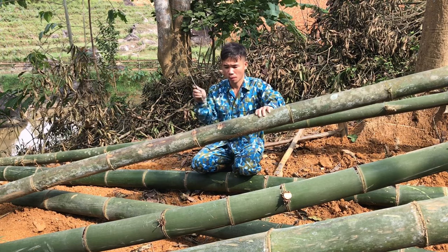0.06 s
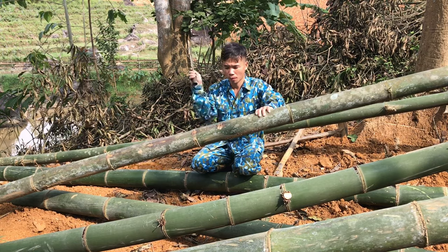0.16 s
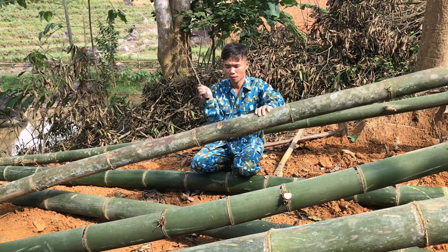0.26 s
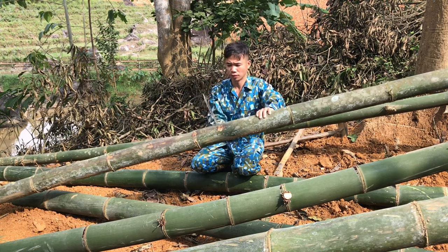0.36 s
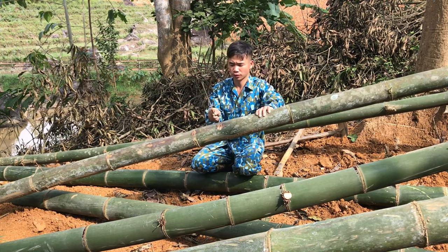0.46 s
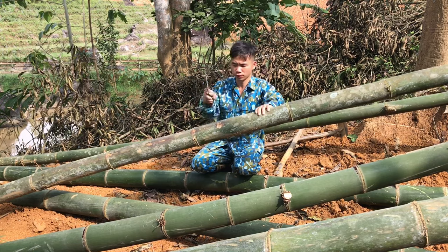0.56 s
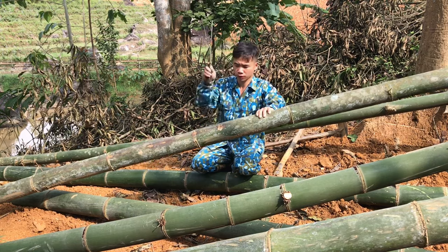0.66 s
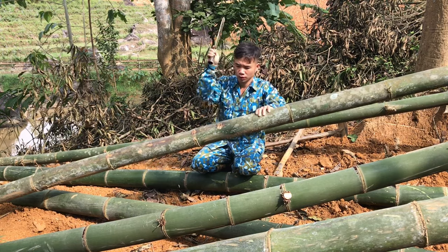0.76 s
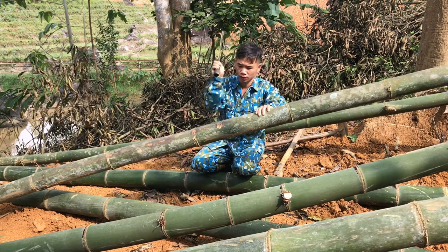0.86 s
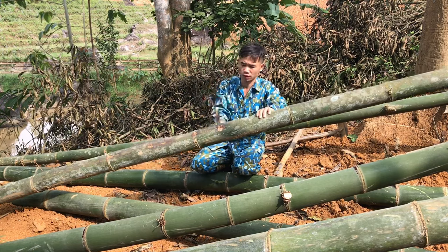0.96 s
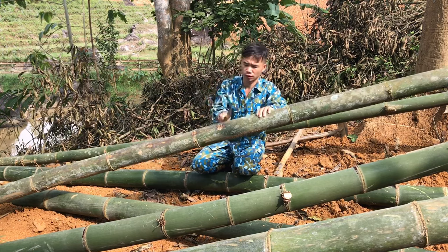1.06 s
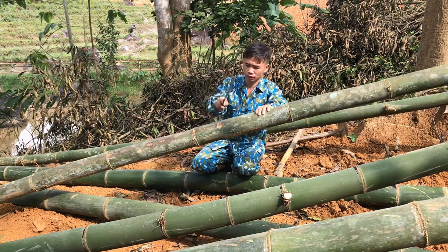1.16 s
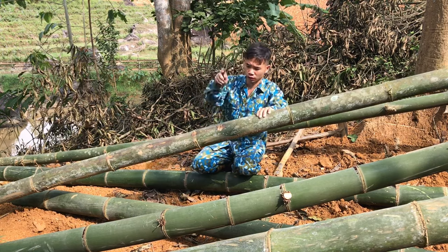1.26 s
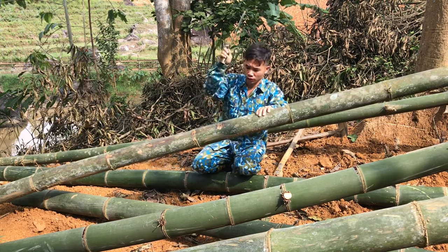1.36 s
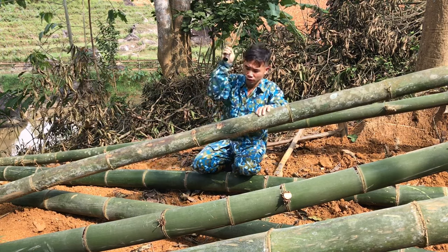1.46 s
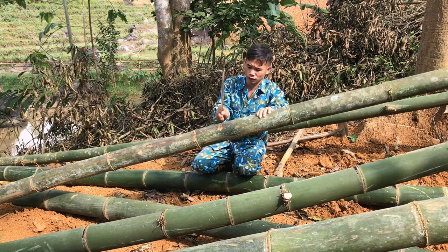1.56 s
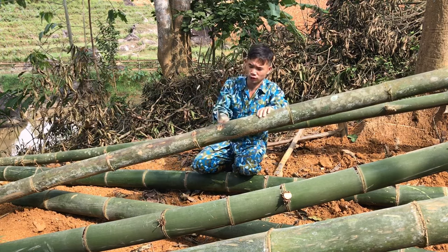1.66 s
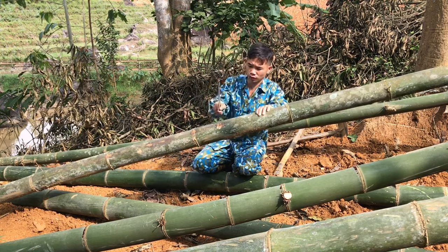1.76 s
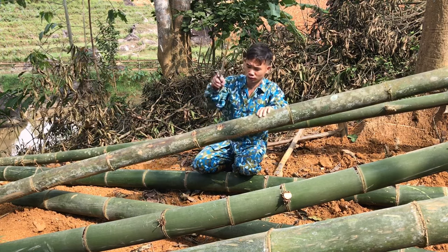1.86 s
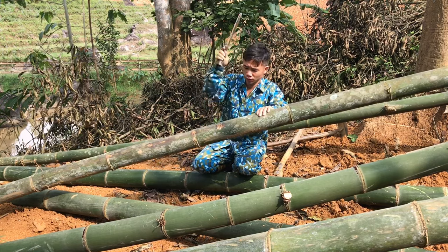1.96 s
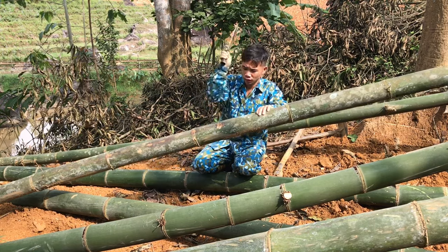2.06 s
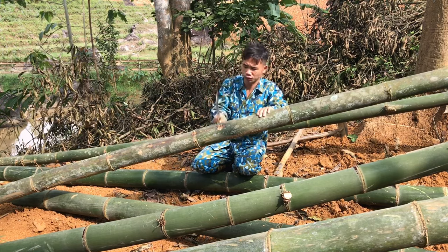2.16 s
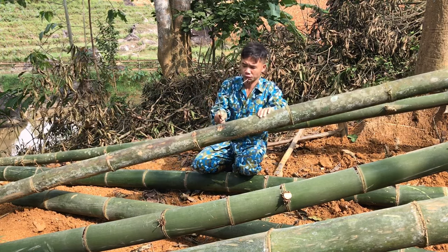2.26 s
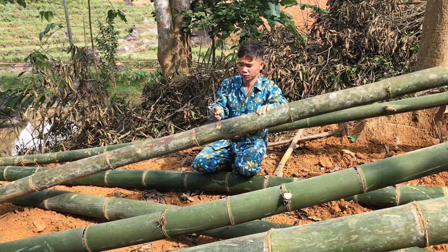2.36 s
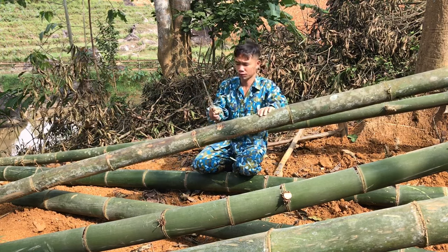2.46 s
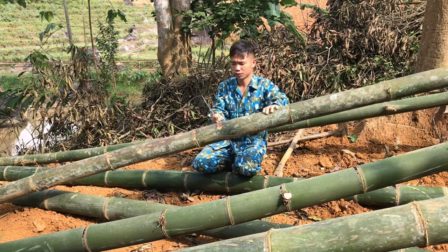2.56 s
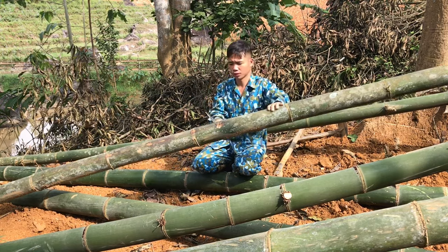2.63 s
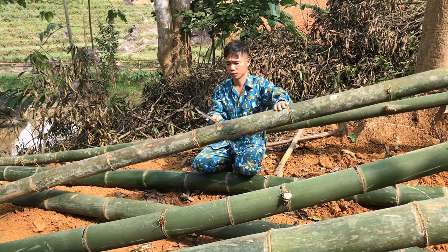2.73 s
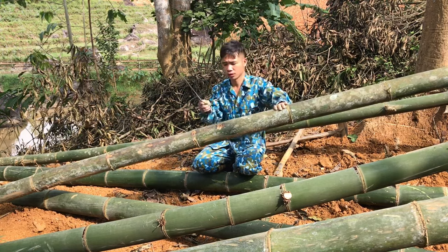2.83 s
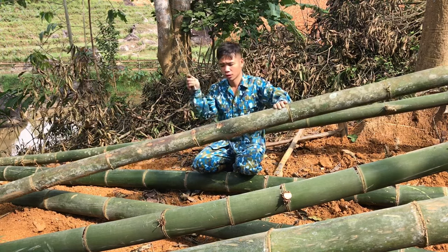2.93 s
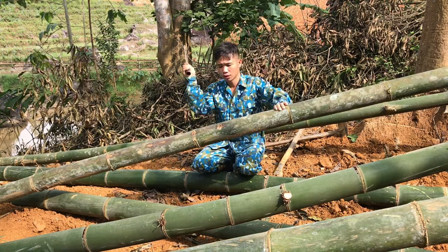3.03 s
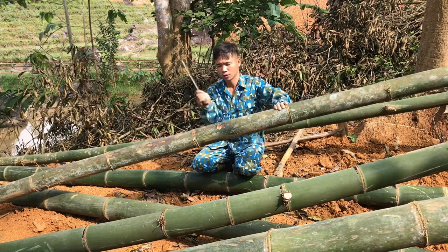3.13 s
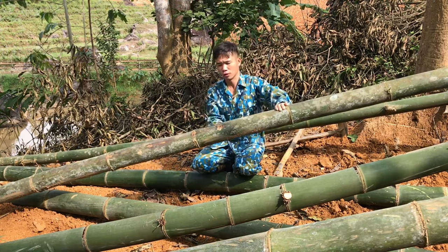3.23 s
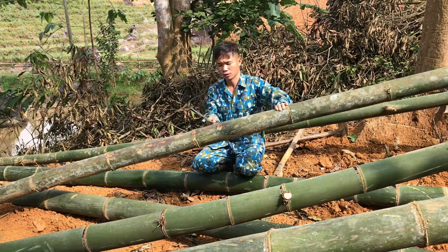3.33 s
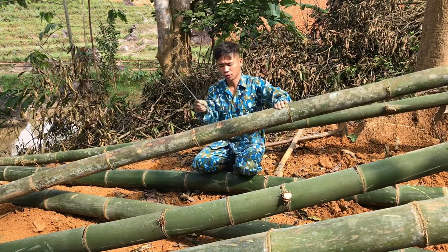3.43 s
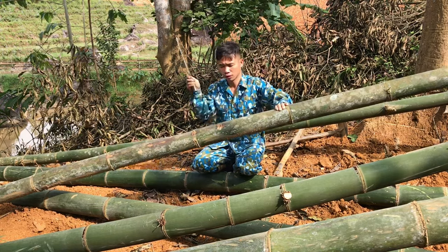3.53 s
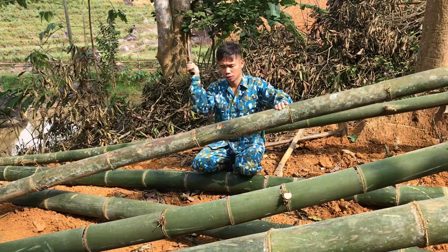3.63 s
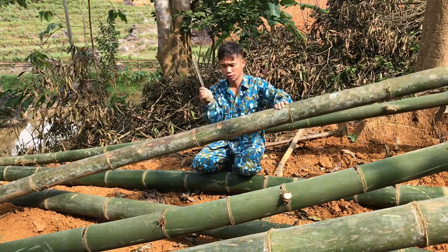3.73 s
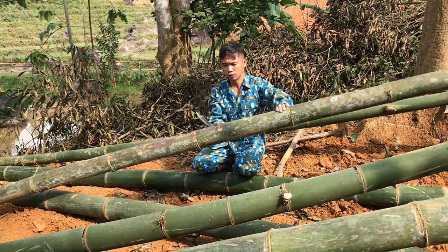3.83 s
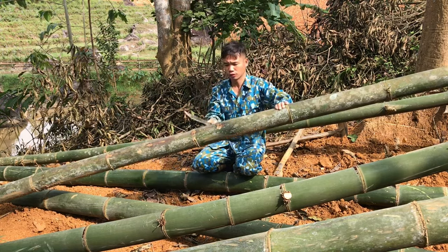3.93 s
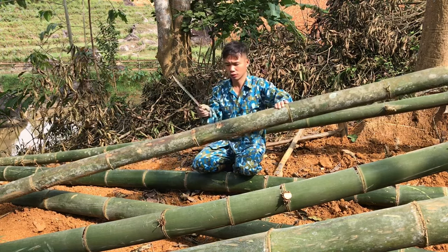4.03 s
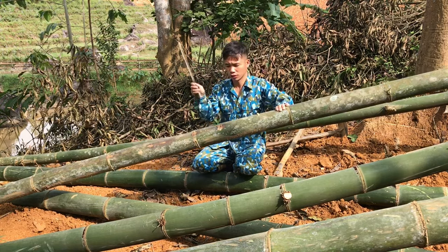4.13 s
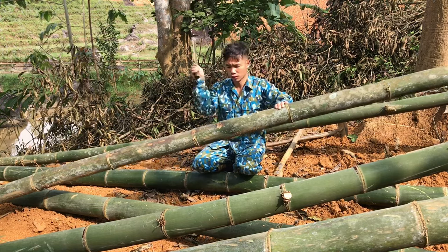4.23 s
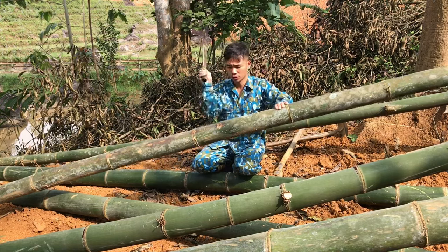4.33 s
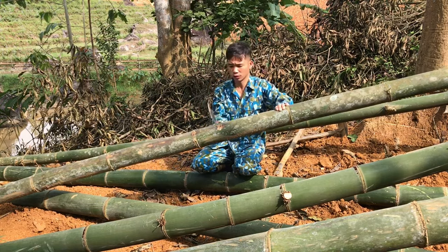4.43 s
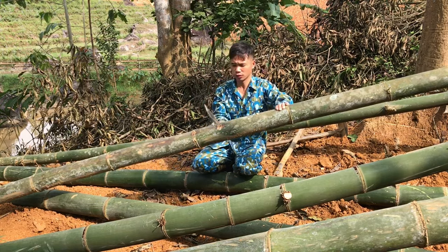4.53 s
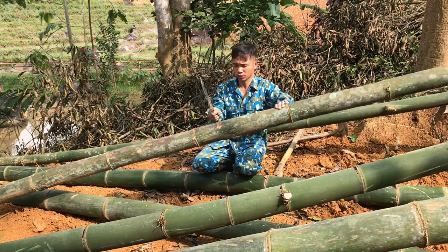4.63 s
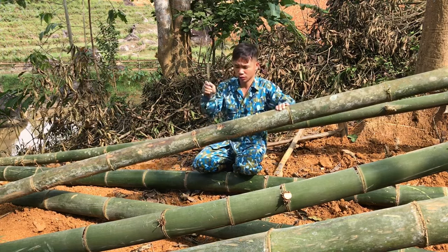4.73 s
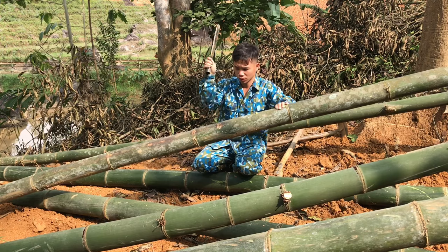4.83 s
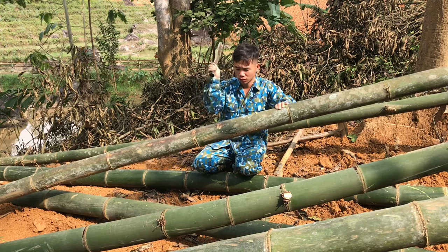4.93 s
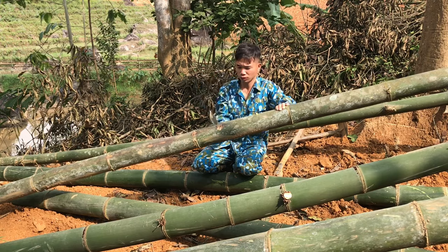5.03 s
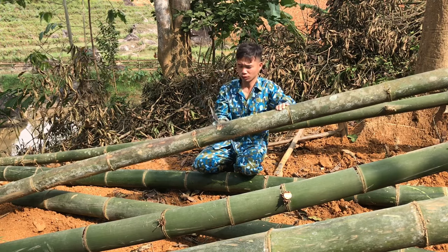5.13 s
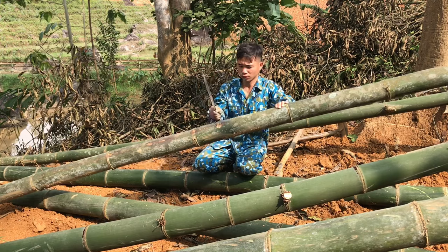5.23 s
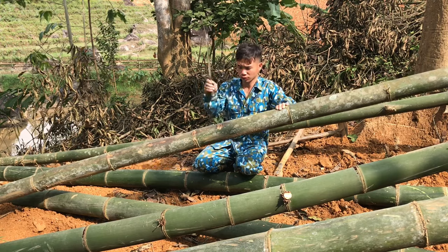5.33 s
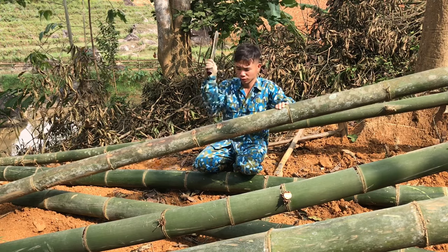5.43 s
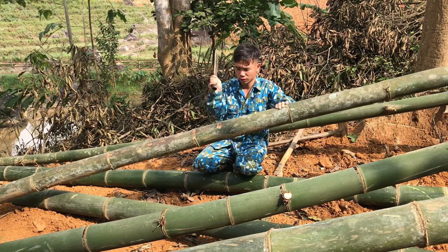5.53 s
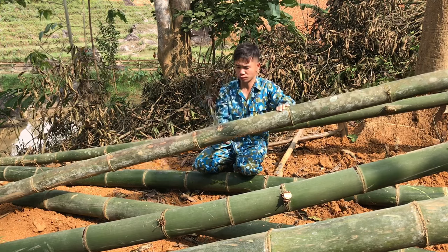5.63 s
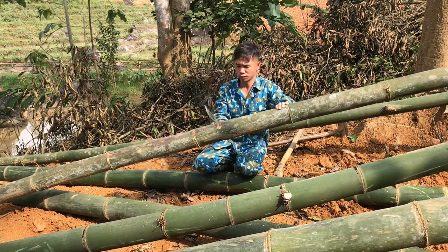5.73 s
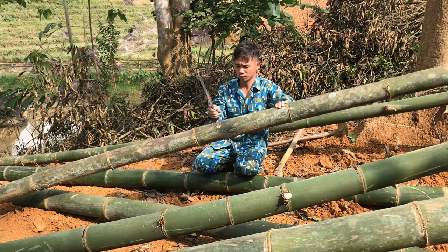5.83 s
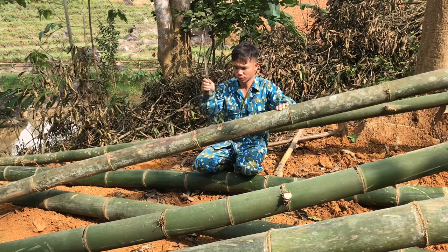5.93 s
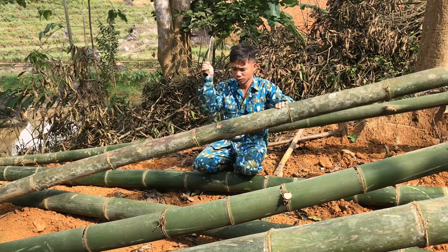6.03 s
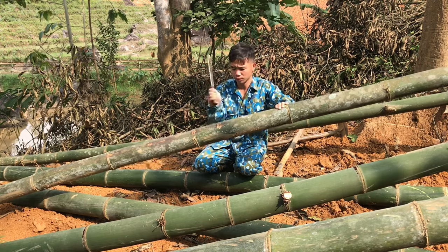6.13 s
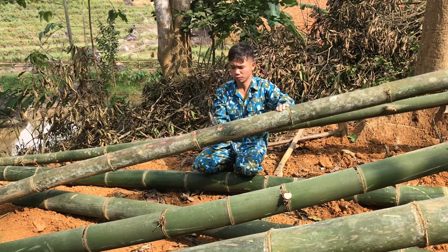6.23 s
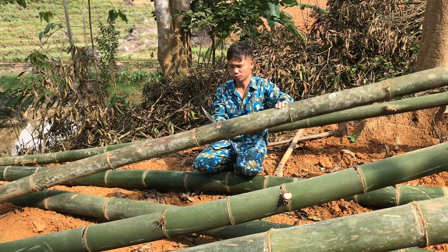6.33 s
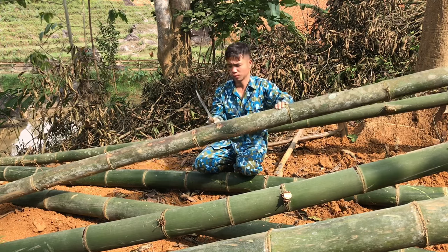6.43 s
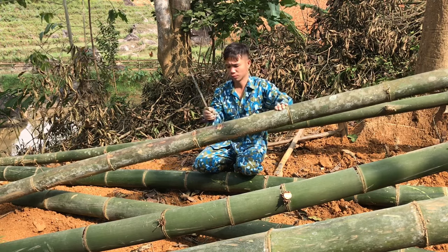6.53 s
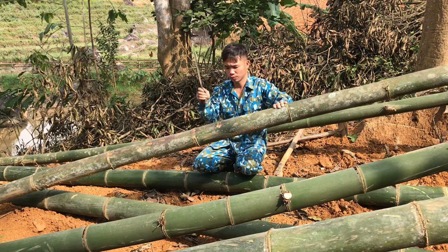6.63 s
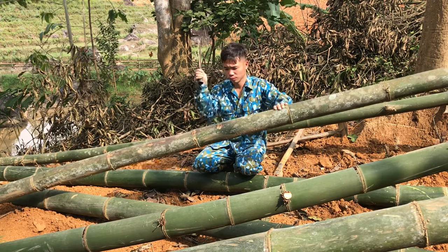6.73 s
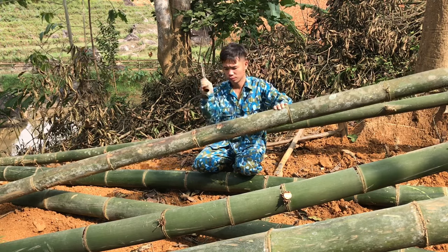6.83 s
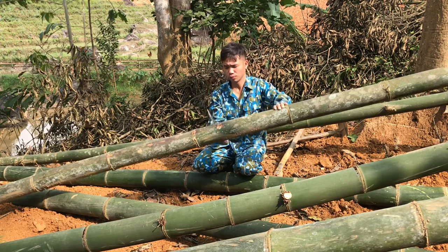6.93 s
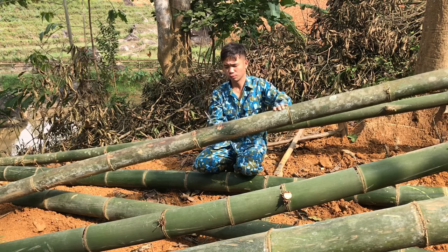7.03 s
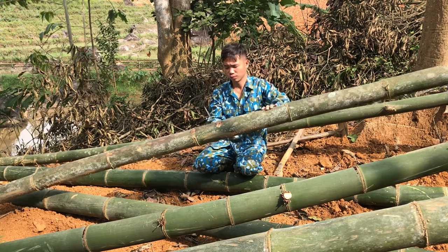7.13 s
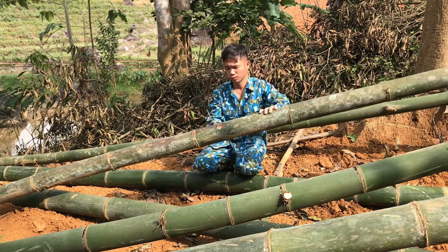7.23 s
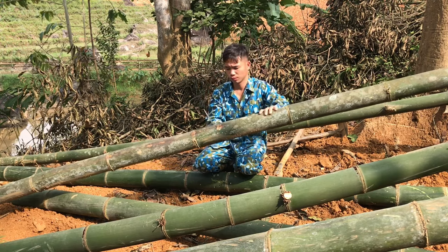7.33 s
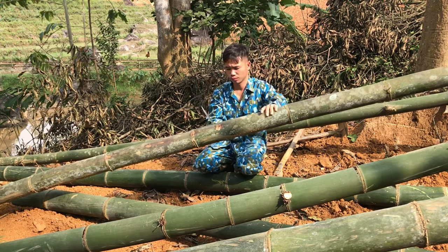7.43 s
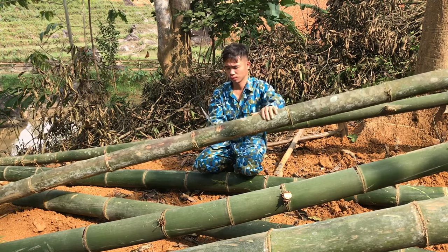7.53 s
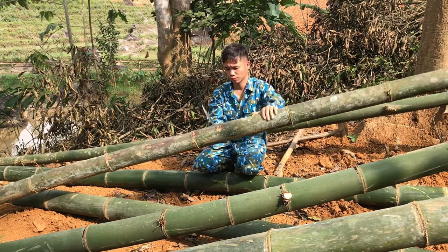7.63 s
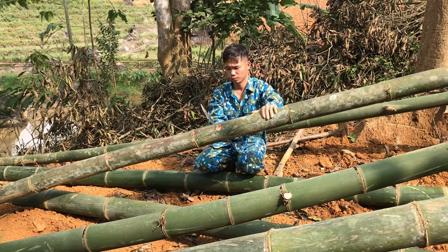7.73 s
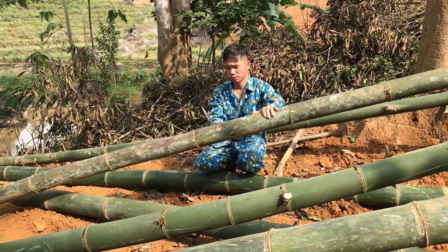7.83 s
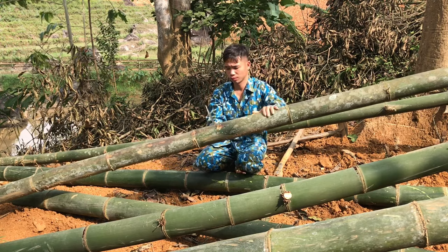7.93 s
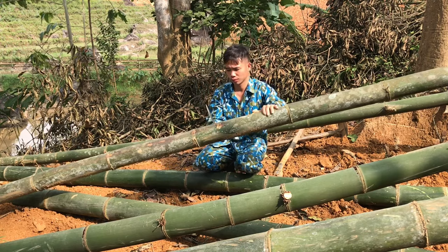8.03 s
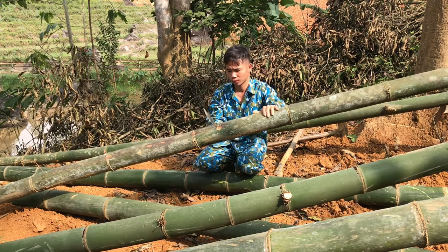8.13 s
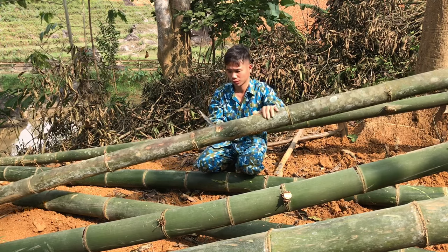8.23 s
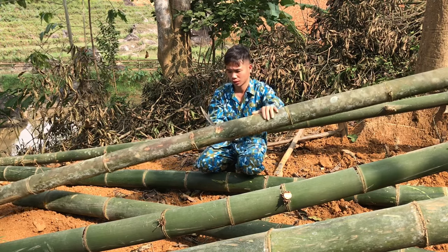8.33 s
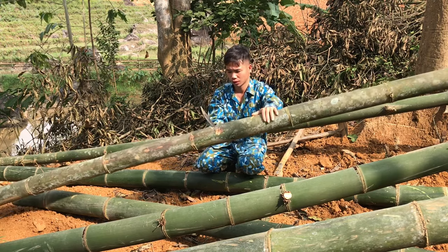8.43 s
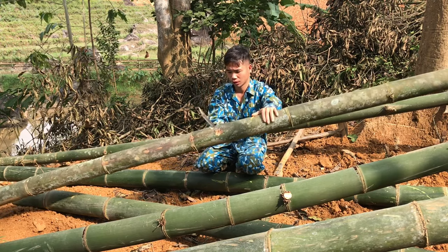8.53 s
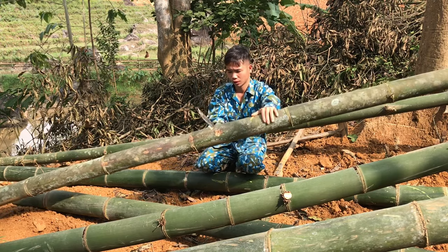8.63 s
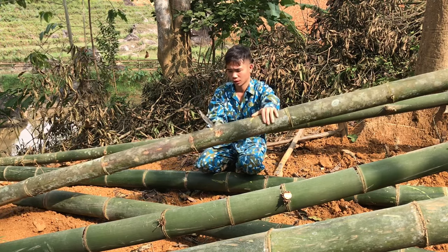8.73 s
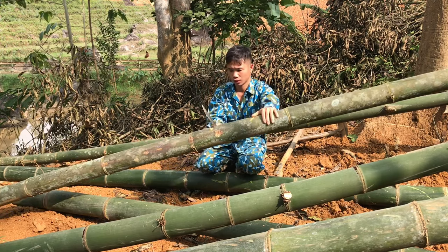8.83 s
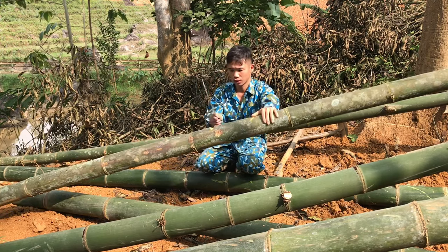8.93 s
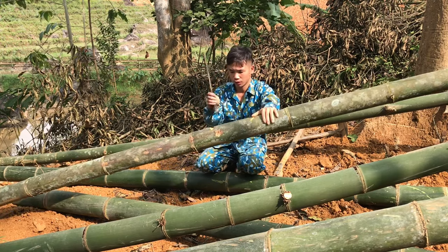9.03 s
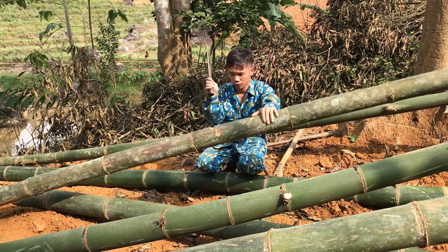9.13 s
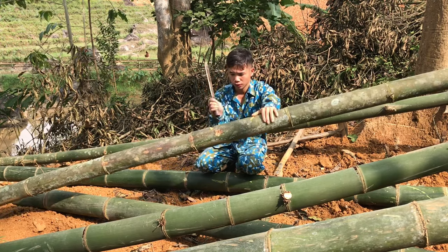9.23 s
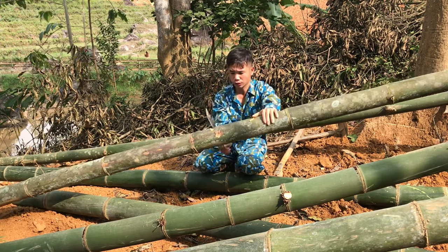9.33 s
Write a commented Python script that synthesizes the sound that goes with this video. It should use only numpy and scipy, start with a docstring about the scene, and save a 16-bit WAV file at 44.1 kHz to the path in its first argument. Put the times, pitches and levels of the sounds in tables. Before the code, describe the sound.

The fading hillside return of an earlier chop opens the scene, over faint air hiss, rustling leaves and a barely audible low engine thud. A heavy blade hits hollow green bamboo at 0.4 s, the loudest blow, then at 1.0, 1.6 and 2.2 s. Each is an abrupt splintering crack with a short woody clack, hollow resonance and a touch of blade ring, followed by a rough, diffuse outdoor tail. A brief rub and faint tap come around 2.5 s. Blows resume at 3.2 s and continue about every 0.6 s until 6.9 s, varying in pitch and boom. Dry leaves tick and stray thin bird whistles slip between. From 7.3 s the blade rubs softly; two damped taps sound near 8.4 and 8.6 s as a bird gives three quick high two-note phrases. One last, weaker chop lands at 9.3 s. Loud peaks are slightly squashed.

```python
"""Chopping green bamboo with a machete

Twelve heavy blows and a few light taps in the pauses, outdoors: noise bands crack, sine modes ring the hollow pole.
Bushes, tree trunks, a far bank and a hillside return the sound as smeared, uneven noise.
Dry litter ticks, a bird whistles and a far engine thuds as a stack of harmonics under shaped hiss.
The recorder's limiter ducks under loud blows."""
import sys
import numpy as np
from scipy import signal
from scipy.fft import rfft, irfft
from scipy.io import wavfile
from scipy.ndimage import uniform_filter1d, minimum_filter1d

SR = 44100
rng = np.random.default_rng(int(sys.argv[2]) if len(sys.argv) > 2 else 0)


def write(x):
    x = np.atleast_2d(x).T
    wavfile.write(sys.argv[1], SR, np.round(np.clip(x, -1, 1) * 32767).astype(np.int16))


N = 413658

# Full blows of the blade: t/s, relative strength/dB, pitch of the struck wall/Hz,
# boom of the hollow/dB, ring of the blade/dB, splintering/dB
BLOWS = [(0.357, 5, 1408, 1.5, -13, -4), (0.9805, -1.4, 938, -4, 0.5, -6),
         (1.6062, -2, 1387, 4.5, 0.5, -1.5), (2.1974, 1.2, 1171, 4, -1.5, 0), (3.207, 0, 1591, -2, -2, 2),
         (3.813, 3, 1212, 3.5, 4.5, -3.5), (4.46, 1.55, 1071, 4.5, -5, -2.4),
         (5.0552, -0.2, 1034, 0.5, -5, 2), (5.6298, 0.5, 952, -7.5, -5.5, 3.5),
         (6.212, 0.5, 1075, -0.5, -5, -4.5), (6.9412, -1, 1448, -10.5, -6.5, -2.5),
         (9.3134, -2.5, 1111, -7, -5.5, -3)]
# Scatter from the hillside, by band: f/Hz, level/dB, rise/s, t60/s
HILLSIDE = [(151.9, -31.5, .06, 0.91), (615, -35, 0.085, 0.96), (1270, -43, 0.098, 2),
            (3550, -29.5, 0.038, 0.81), (8110, -29.5, .05, 0.91), (15000, -37.5, .05, 1)]


def amp(db):
    """Decibels to gain."""
    return 10 ** (np.asarray(db) / 20)


def unit(x):
    """Scales to rms 1."""
    return x / np.sqrt(np.mean(x ** 2) + 1e-20)


def read(points, hz):
    """Reads a (f/Hz, value) table on a log-frequency axis."""
    f, value = np.transpose(points)
    return np.interp(np.log(hz + 1), np.log(f + 1), value)


def add(mix, s, sound):
    """Mixes a sound in at time s."""
    part = mix[max(round(s * SR), 0):][:len(sound)]
    part += sound[:len(part)]


def noise(points, size):
    """Noise of rms 1 with a (f/Hz, level/dB) spectrum."""
    hz = np.fft.rfftfreq(size, 1 / SR)
    spectrum = rfft(rng.standard_normal(size))
    return unit(irfft(spectrum * amp(read(points, hz)), size))


def split(x, centres):
    """Splits x into overlapping bands whose powers sum to one."""
    hz = np.fft.rfftfreq(len(x), 1 / SR)
    spectrum = rfft(x)
    bands = []
    for weights in np.eye(len(centres)):
        power_share = read(list(zip(centres, weights)), hz)
        bands.append(irfft(spectrum * np.sqrt(power_share), len(x)))
    return bands


def swell(t, rise, t60):
    """Builds up over the rise time, then dies by 60 dB in t60."""
    build = 1 - np.exp(-t / np.maximum(rise, 1e-5))
    return build * np.exp(-np.log(1000) * t / t60)


def fibres(size, rough_db):
    """Roughness of fibres that snap in clumps about a millisecond long."""
    clumps = unit(uniform_filter1d(rng.standard_normal(size), size=40))
    return unit(amp(rough_db * clumps))


def hiss():
    """Soft open-air hiss: steady noise with an uneven spectrum."""
    # open air: f/Hz, relative level per Hz/dB
    air = [(25, -17), (48, 11.5), (70, 13.5), (130, 3), (280, 9), (550, 2), (1300, 3.5), (2200, -4.5),
           (3800, 1), (6000, -6), (10000, -13.5), (15800, -6.5)]
    return amp(-66) * noise(air, N)


def leaves():
    """Leaves stir in a breeze that slowly sways the level of rough, bright noise."""
    breeze = noise([(0, 0), (6, -6), (20, -30), (80, -140)], N)
    rustle = noise([(500, -23.5), (3500, -4.0), (7000, -8.5), (15000, -9)], N)
    return amp(-78.0) * unit_free_sway(rustle, breeze) * fibres(N, rough_db=4.5)


def unit_free_sway(rustle, breeze):
    """The breeze lifts and lowers the rustle by 3 dB rms."""
    return rustle * amp(3 * breeze)


def engine():
    """Slow thudding of a far engine: harmonics of one rate that drifts a little."""
    # engine spectrum: f/Hz, relative level/dB
    engine_tone = [(25, -23), (50, -4.5), (76, -12), (101, -9.5), (126, 1), (152, 0.5), (177, -3), (202, 1),
                   (260, -10.5), (400, -17.5)]
    rate_hz = 25.3
    drift = noise([(0, 0), (1, -6), (4, -60), (20, -140)], N)
    turns = np.cumsum(rate_hz * (1 + 0.0018 * drift)) / SR
    thud = np.zeros(N)
    for k in range(1, 16):
        offset = .08 * rng.standard_normal()  # phases nearly aligned, so the harmonics pulse together
        thud += amp(read(engine_tone, k * rate_hz)) * np.cos(2 * np.pi * (k * turns + offset))
    return amp(-70) * unit(thud)


def lingering(ago, db):
    """The hillside still sounds from a blow struck a number of seconds before the start."""
    earlier, out = np.zeros(2 * SR), np.zeros(N)
    add(earlier, 0, amp(db) * chop(0, *BLOWS[1][2:]))
    add(out, 0, echo(earlier, [(HILLSIDE, 0)])[round(ago * SR):])
    return out


def scatter(hz, step, bands, delay):
    """Share of the power that one part of the land returns, for each frequency and lag."""
    centres, *columns = np.transpose(bands)
    db, rise, t60 = (read(list(zip(centres, c)), hz)[:, None] for c in columns)
    lag = np.maximum(np.arange(0, 1.5, step) - delay, 0)
    shape = swell(lag, rise, t60) ** 2
    return amp(db) ** 2 * shape / shape.sum(1, keepdims=True)


def echo(x, places, patchy_db=1):
    """Countless reflections smear the power of x in time and scramble it into uneven noise."""
    frame = dict(fs=SR, nperseg=512, noverlap=384)
    hz, t, z = signal.stft(x, **frame)
    response = sum(scatter(hz, t[1], bands, delay) for bands, delay in places)
    power = signal.fftconvolve(abs(z) ** 2, response, axes=1)[:, :len(t)]
    patches = uniform_filter1d(rng.standard_normal(z.shape), size=3, axis=0)
    patches = unit(uniform_filter1d(patches, size=16, axis=1))
    grain = signal.stft(rng.standard_normal(len(x)), **frame)[2] * amp(patchy_db * patches)
    scrambled = grain * np.sqrt(abs(power) / np.mean(abs(grain) ** 2))
    return signal.istft(scrambled, **frame)[1][:len(x)]


def leaf_ticks():
    """Dry leaves tick: short bright noise bursts, the sharpest placed, faint ones by chance."""
    # sharpest ticks: t/s, relative level/dB
    sharp = [(4.352, -43.5), (5.4382, -38.5), (6.5796, -43), (6.61, -36), (7.809, -45), (8.1758, -45.5)]
    faint = [(rng.random() * N / SR, -47.5) for _ in range(12)]
    out, t = np.zeros(N), np.arange(SR // 30) / SR
    for s, db in sharp + faint:
        tick = noise([(500, -11.5), (3000, 8), (7000, 4), (15000, 0)], len(t))
        add(out, s, amp(db - 9) * tick * swell(t, .0002, 0.023))
    return out


def rubbing():
    """The blade rubs out of the cut and dry litter stirs: rough noise that fades in and out."""
    # rubs: t/s, length/s, level before the fades/dB
    rubs = [(2.448, 0.28, -60.5), (4.352, 0.07, -63), (7.298, .26, -64), (7.698, 0.22, -73)]
    out = np.zeros(N)
    for s, length, db in rubs:
        size = round(length * SR)
        rub = noise([(300, -12.5), (3000, 4), (9000, -1.0), (15000, 1.5)], size)
        rub = rub * fibres(size, rough_db=1.5)
        add(out, s, amp(db) * rub * signal.windows.tukey(size, .5))
    return out


def whistle(start_hz):
    """A thin, wavering whistle whose fall steepens; leaves on the way blur it."""
    length = 0.064 * (start_hz / 4401) ** 2.3  # s; higher whistles last longer
    u = np.linspace(0, 1, round(length * SR))
    waver_hz = 220 * unit(uniform_filter1d(rng.standard_normal(len(u)), size=40))
    end_share = 0.67  # of the first pitch, before the waver
    hz = start_hz * (1 - (1 - end_share) * u ** 2) + waver_hz
    return np.sin(2 * np.pi * np.cumsum(hz) / SR) * signal.windows.tukey(len(u), .5)


def bird():
    """A few lone whistles, then three even phrases of a note and its softer repeat."""
    # lone whistles: t/s, start f/Hz, level/dB
    lone = [(0.295, 4270, -62), (2.052, 3370, -63.5), (2.947, 3320, -68), (4.924, 4640, -70)]
    song_s, step_s, second_s = 8.46, .24, 0.063  # first phrase, phrase spacing, lag of the second note
    song_hz, song_db, second_db = 5300, -70.5, -2  # second_db is relative to the first note
    out = np.zeros(N)
    for s, hz, db in lone:
        add(out, s, amp(db) * whistle(hz))
    for k in range(3):
        s = song_s + k * step_s
        add(out, s, amp(song_db) * whistle(song_hz))
        add(out, s + second_s, amp(song_db + second_db) * whistle(song_hz))
    return out


def swish(length, db, climb_db):
    """Air rushes round the falling blade, loudest as it lands."""
    size = round(length * SR)
    rush = noise([(60, -8), (300, 0), (1200, -2), (3000, -8), (6000, -24), (15000, -34)], size)
    return amp(db + np.linspace(-climb_db, 0, size)) * rush


def burst(bands, t, colour, ring):
    """Many crowded resonances: each band of noise builds and dies at its own speed."""
    parts = split(rng.standard_normal(len(t)), [row[0] for row in bands])
    out = np.zeros(len(t))
    for part, (hz, db, rise, t60) in zip(parts, bands):
        out += amp(db + read(colour, hz)) * unit(part) * swell(t, rise * ring, t60 * ring)
    return out


def blow(ring, wall_hz, thud, hollow, clack, bite, splinter):
    """The edge cracks in; the wall and the hollow pole ring, a little differently at each spot."""
    # corner frequencies of the blow's tone colour: f/Hz
    colour_hz = [520, 650, 710, 850, 1100, 1500, 3100, 6000]
    # the next three tables: f/Hz, relative level/dB, rise/s, t60/s (times before the ring factor)
    # the edge breaking in, by band
    crack_bands = [(890, -14.5, 0.00074, 0.099), (2140, -14.5, 0.0015, 0.047), (4230, -6, 0.0035, 0.04),
                   (6000, -6, 0.00069, 0.015), (7600, -7.5, 0.0013, 0.011), (10200, -12, 0.00058, 0.025),
                   (14900, -0.5, 0.00034, 0.0056)]
    # dense ring of the split wall, by band
    wall_bands = [(70, -32, 0.0071, 0.36), (173, -24, 0.012, 0.11), (376, -9, 0.027, 0.14),
                  (860, -4, 0.0077, 0.11), (1590, -1, 0.025, 0.074), (2280, -13.5, 0.0018, 0.12),
                  (3700, -14.5, 0.0011, 0.14), (4860, -19.5, 0.0011, 0.11), (7700, -24.5, 0.00085, 0.13),
                  (11000, -26.5, .0004, 0.13), (14600, -19.5, .0004, 0.14)]
    # modes of the pole and, highest, the blade
    modes = [(129.6, -23, 0.01, 0.15), (159, -21.5, .008, 0.13), (227, -9, 0.011, 0.13),
             (353.7, -11.5, 0.0092, 0.14), (406.4, -15, 0.0026, .12), (451, -14, 0.0093, 0.11),
             (517.4, -11.5, 0.029, 0.14), (671.4, -3, .009, .115), (693.9, -5.5, 0.008, 0.11),
             (911, -17.5, 0.012, 0.22), (958, -9, 0.0037, .1), (1095, -6.5, 0.0071, 0.051),
             (1232, -11, 0.011, .095), (1336, -11, 0.0033, 0.11), (1457, -13.5, 0.01, 0.13),
             (1650, -11, 0.0037, .085), (1768, -16, 0.0066, 0.09), (2080, -18.5, 0.0086, 0.046),
             (2356, -19, 0.0016, 0.16), (2886, -6.5, 0.002, 0.022), (3052, 0, 0.0023, 0.025)]
    t = np.arange(SR // 3) / SR
    wood = [thud, hollow, hollow, 0, 0, clack]
    colour = list(zip(colour_hz, wood + [bite, splinter]))
    # in the noise, the crunch near 3 kHz follows partly the blade, partly the splintering
    crunch_db = -1 + .4 * bite + .6 * splinter
    crunch = list(zip(colour_hz, wood + [crunch_db, splinter]))
    sound = burst(crack_bands, t, crunch, 0.77) * fibres(len(t), rough_db=6.0)
    sound += burst(wall_bands, t, crunch, ring) * fibres(len(t), rough_db=1.5)
    for hz, db, rise, t60 in modes + [(wall_hz, -6, .003, .1)]:
        detune, phase = 1 + .005 * rng.standard_normal(), rng.random()
        tone = np.sin(2 * np.pi * (hz * detune * t + phase))
        sound += amp(db + read(colour, hz)) * swell(t, rise * ring, t60 * ring) * tone
    return sound


def chop(notch, wall_hz, hollow_db, blade_db, splinter_db):
    """A full blow into a notch 0-1 deep: the depth sets the thud, the struck wall the clack."""
    thud_db = -0.6 + 6.5 * notch ** 7.6  # the thud grows mostly in the last blows
    clack_db = 5.5 * np.log2(wall_hz / 890)  # 5.5 dB per octave: a higher wall clacks more
    return blow(1.037, wall_hz, thud_db, hollow_db, clack_db, blade_db, splinter_db)


def tap(grip, hard_db):
    """A light touch of the blade; the holding hand damps the pole and stills its hollow."""
    # ring factor, thud/dB, boom of the hollow/dB, clack/dB
    free, held = (0.9, 12.5, 14, -2), (0.5, 6, -13, 4)
    ring, thud_db, hollow_db, clack_db = (np.interp(grip, [0, 1], ends) for ends in zip(free, held))
    splinter_db = 0.31 * hard_db  # contact hardness changes the blade's ring more than the splintering
    return blow(ring, 1070, thud_db, hollow_db, clack_db, hard_db, splinter_db)


def machete():
    """Each swing ends in a blow that deepens the notch; in the pauses the blade taps the pole."""
    # taps and bounces: t/s, relative strength/dB, grip of the hand/0-1, hardness of the contact/dB
    taps = [(2.651, -37, 0.01, 12), (8.364, -40, 1, -14), (8.5633, -34.5, 0.92, -8.5),
            (8.617, -56.5, 0.4, -3)]
    out = np.zeros(N)
    for notch, (s, db, *spot) in zip(np.linspace(0, 1, len(BLOWS)), BLOWS):
        rush = swish(length=.045, db=-48, climb_db=20)
        add(out, s - len(rush) / SR, amp(db) * rush)
        add(out, s, amp(db) * chop(notch, *spot))
    for s, db, grip, hard_db in taps:
        add(out, s, amp(db) * tap(grip, hard_db))
    return amp(-1.5) * out


def scene():
    """Mixes the chopping, litter and bird with their returns from the land and the background."""
    # returns from the land, by band: f/Hz, level/dB, rise/s, t60/s
    # bushes nearby
    bushes = [(150, -20.5, 0.011, 0.21), (600, -23, 0.009, 0.24), (1330, -16, 0.0038, 0.29),
              (3420, -14, 0.01, .35), (8200, -4.5, 0.0016, 0.2), (15000, -12.5, 0.0055, 0.28)]
    # distinct return from tree trunks
    trunks = [(1203, -65, .02, .25), (1312.6, -11, 0.011, 0.33), (1450, -68, .02, .25)]
    # distinct return from a far bank
    bank = [(157.5, -45.5, 0.039, 0.45), (335, -37.5, 0.024, .5), (710, -45, 0.014, 0.31),
            (1409, -43, 0.022, 0.4), (3936, -46.5, 0.019, .5)]
    places = [(bushes, .004), (HILLSIDE, .01), (trunks, .075), (bank, .2)]  # each with its delay/s
    near = machete() + leaf_ticks() + rubbing() + bird()
    background = hiss() + leaves() + engine()
    return (near + echo(near, places) + lingering(ago=0.55, db=12.5) + background)[None]


def limit(x, ceiling_db, slope, hold, recover_db):
    """Turns peaks down by a share (slope) of their excess, holds, then lets the level recover."""
    over = np.maximum(20 * np.log10(abs(x) + 1e-9) - ceiling_db, 0)
    size = 2 * round(hold * SR / 2) + 1
    held = -minimum_filter1d(-over, size, origin=size // 2, mode="constant")
    fall = np.arange(N) * recover_db / SR  # the excess is let go at recover_db a second, before the slope
    excess_db = np.maximum.accumulate(held + fall) - fall
    return x * amp(-slope * uniform_filter1d(excess_db, size=40))


def record(dry):
    """A low cut, a limiter, soft overload, a microphone dip near 10 kHz and the band limit."""
    x = signal.sosfilt(signal.butter(3, 48, "highpass", fs=SR, output="sos"), dry[0])
    x = limit(x, ceiling_db=-6.5, slope=0.56, hold=0.16, recover_db=78)
    full = .72  # amplitude the overload approaches
    x = x / (1 + (x / full) ** 6) ** (1 / 6)
    x = x - 0.5 * signal.lfilter(*signal.iirpeak(10300, 10, SR), x)
    band_limit = signal.firwin(401, 15950, window=("kaiser", 9), fs=SR)
    return signal.oaconvolve(x, band_limit, "same")[None]


dry = scene()
out = record(dry)
write(out)
```